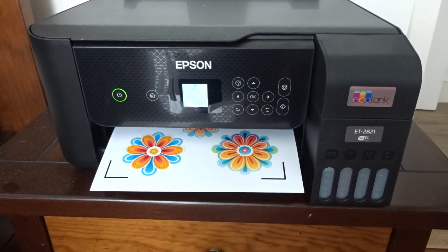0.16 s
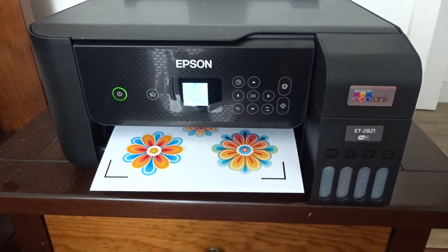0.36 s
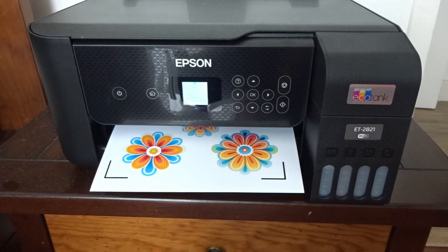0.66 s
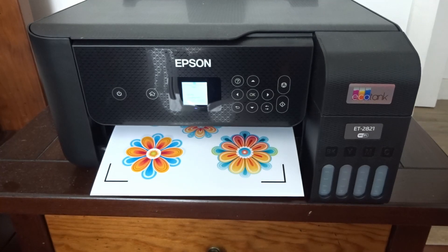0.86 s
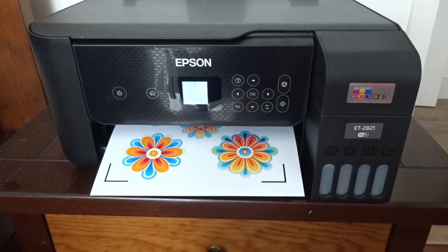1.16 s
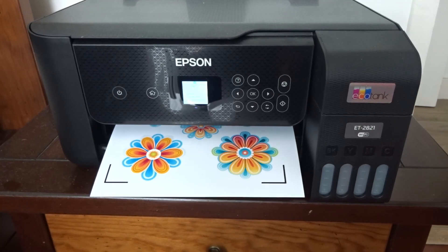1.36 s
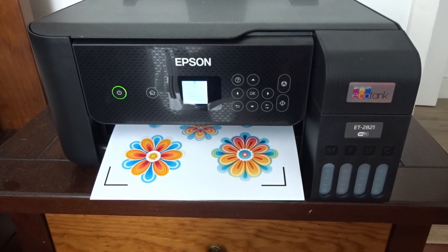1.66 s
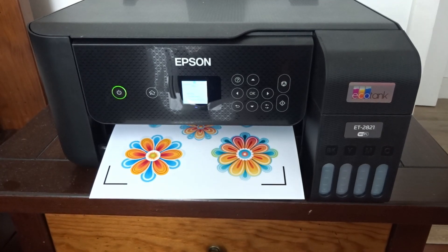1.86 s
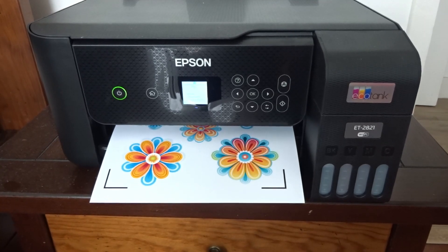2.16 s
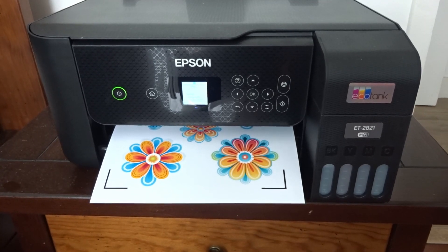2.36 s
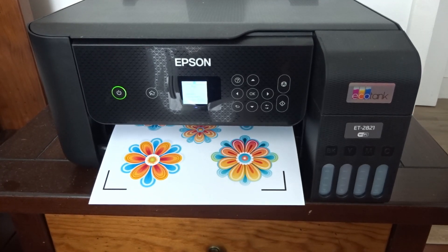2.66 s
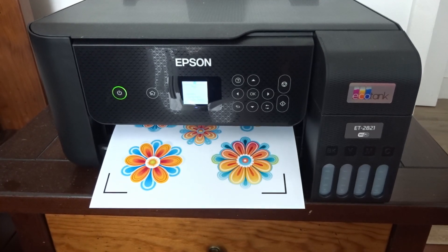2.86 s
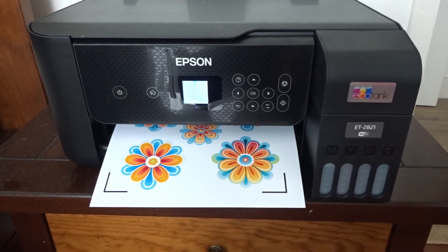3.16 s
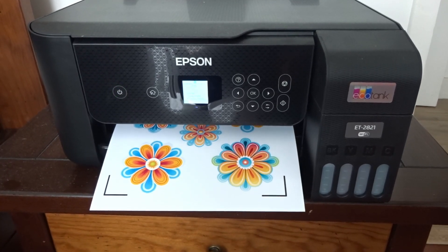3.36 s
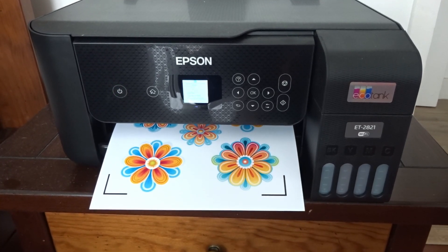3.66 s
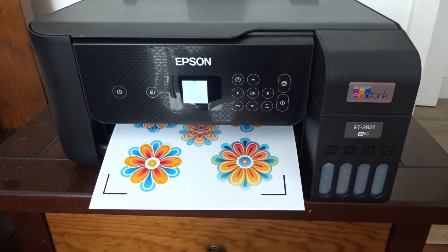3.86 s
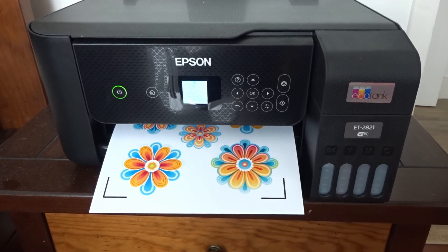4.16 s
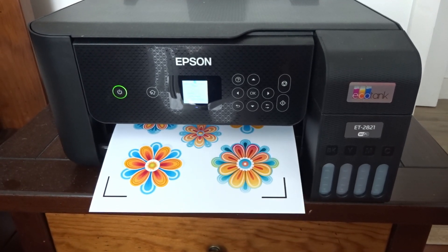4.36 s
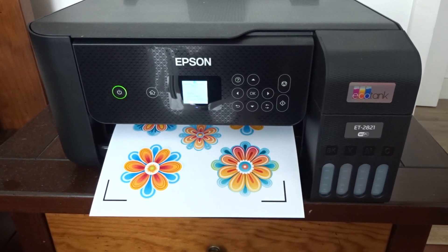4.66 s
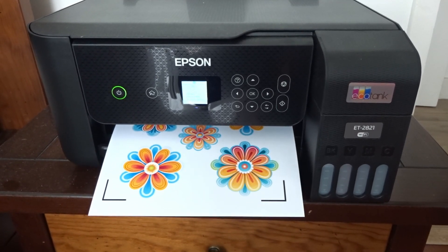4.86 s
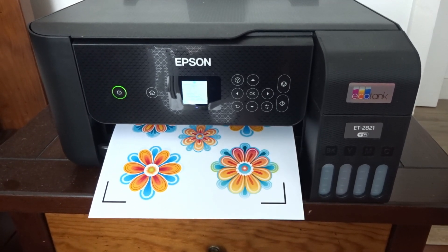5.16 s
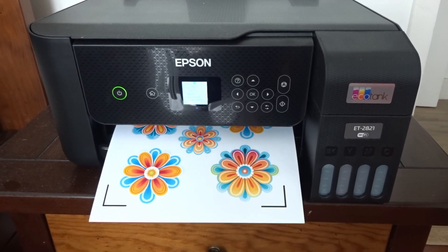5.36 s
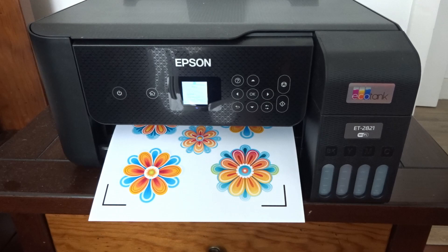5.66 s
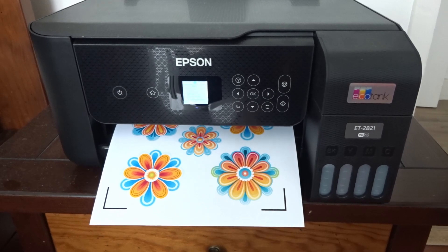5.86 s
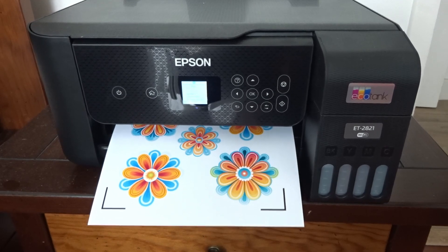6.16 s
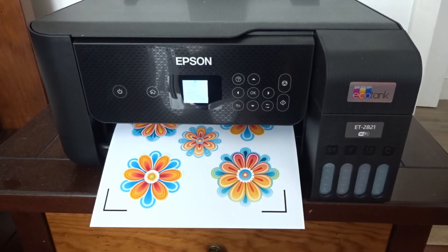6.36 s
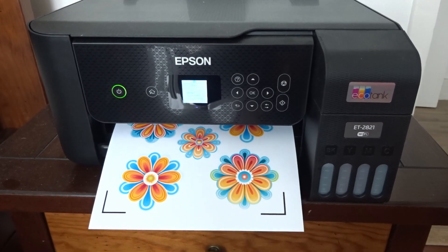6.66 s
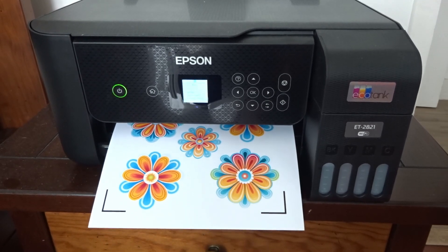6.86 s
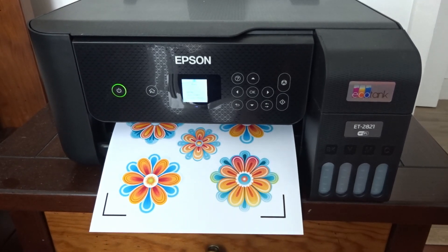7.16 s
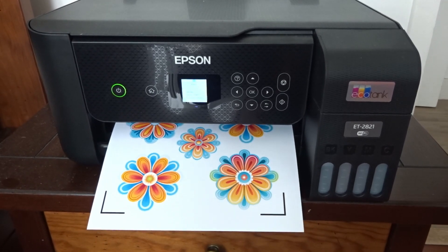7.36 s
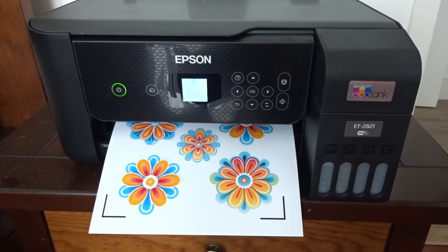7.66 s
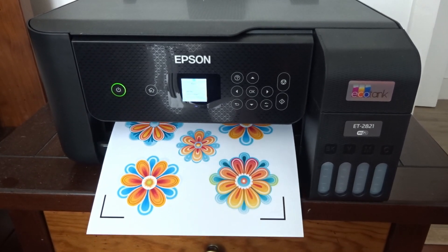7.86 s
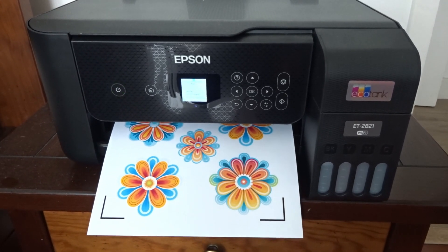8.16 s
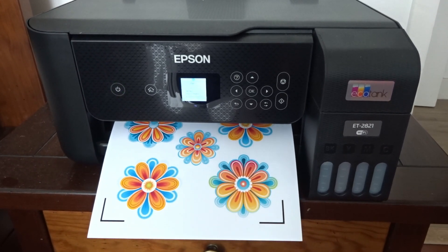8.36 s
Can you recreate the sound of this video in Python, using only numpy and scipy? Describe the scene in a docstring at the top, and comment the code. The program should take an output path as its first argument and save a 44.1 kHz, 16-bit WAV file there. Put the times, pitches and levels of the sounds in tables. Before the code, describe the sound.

A desktop inkjet printer shuttles its carriage back and forth, gears knocking at each turn, pauses briefly, then a plastic lever snaps and printing continues.

```python
"""An inkjet printer prints a page on a wooden cabinet in a quiet room, heard from close in front.
The carriage slides on a resonant rail with a thin motor whine, noise bands that follow its speed, and
scuffs past the same guides on every trip. At each turn the feed gears knock, rattle the case and knock again.
Midway the carriage parks briefly; later a plastic lever snaps over and rattles in filtered bursts of noise.
Diffuse echoes spread the printer to the sides, over a bed of steady coloured room noise."""
import sys
import numpy as np
from scipy import signal
from scipy.fft import rfft, irfft
from scipy.io import wavfile

SR = 44100
rng = np.random.default_rng(int(sys.argv[2]) if len(sys.argv) > 2 else 0)


def pcm_store(signal):
    """Save signal as 16-bit PCM."""
    levels = np.round(np.clip(np.atleast_2d(signal), -1, 1) * 32767)
    wavfile.write(sys.argv[1], SR, levels.astype(np.int16).T)


N = 375291
T = np.arange(N) / SR  # s

# Paper feed steps, one at a turn of the carriage. Each row: start in seconds, then the relative levels
# in dB of the starting knock, its case thud, the braking knock and the gear rattle.
FEEDS = [(0.002, -33, -37.5, -46, -48.5), (0.3995, -31.5, -40, -44, -46), (0.7955, -31, -36.5, -40, -48.5),
         (1.1944, -30, -45, -41, -47), (1.5938, -28.5, -37, -26.5, -45.5), (2.0053, -23.5, -33, -22, -44),
         (2.4171, -21, -28, -31, -47.5), (2.8389, -32, -36, -35, -45.5), (3.253, -26, -33, -35, -45),
         (4.5232, -30, -40, -42, -48), (4.9377, -27.5, -37, -27.5, -47), (5.3552, -29.5, -35.5, -38, -48),
         (5.779, -29.5, -40, -27.5, -46.5), (6.1949, -30, -37.5, -42, -44.5),
         (6.6084, -29, -36, -44, -46.5), (7.0253, -26.5, -32.5, -28, -46), (7.443, -26.5, -35, -40, -46.5),
         (7.8615, -19, -30.5, -34, -45.5), (8.2786, -31, -34, -32.5, -48)]
# The carriage stands still between these two times: stop and restart in seconds.
REST = (3.696, 4.078)
# Spectrum of the meshing gear teeth. Each row: frequency in Hz, relative level in dB.
GEARS = [(70, -33), (120, -28), (145, -12.5), (185, -18.5), (220, 0.5), (350, -2), (550, 2.5), (900, -2.5),
         (1350, -5.5), (1700, -8.5), (2200, -5), (3500, -11.5), (4300, -11.5), (15000, -23)]
# Resonances of the plastic case. Each row: centre in Hz, width in Hz, height in dB.
CASE_MODES = [(226, 14, 2.4), (231.5, 16, 2.4), (284, 12.5, 8.6), (332, 11, 2.4), (409.6, 4.3, 8),
              (497, 63, 7.4), (583, 25, 3.6), (705, 18, 11), (793, 35, 7.8), (1020, 150, 3.8),
              (1310, 68, 1.1), (1504, 76, 3.1), (1930, 390, 6.5), (2320, 310, 1.05), (3370, 210, 4)]
FEED_S = .108  # the carriage waits this long for each feed step
PUSH_S = .034  # a feed step drives this long, then brakes
PARK_RUN_S = .033  # extra travel between the page and the parking place


def undb(db):
    """Convert a level in decibels to an amplitude ratio."""
    return 10 ** (np.asarray(db) / 20)


def unit(x):
    """Normalise the mean power: scale to rms 1."""
    return x / np.sqrt(np.mean(x ** 2))


def add(out, s, x):
    """Superpose x on out from time s on."""
    i = max(int(s * SR), 0)
    out[i:i + len(x)] += x[:max(N - i, 0)]


def walk(rate):
    """Slow random modulation: random knots, rate per second, joined by lines; spread near 1."""
    knots = rng.standard_normal(N // 8)
    return 1.22 * np.interp(T * rate, np.arange(len(knots)), knots)


def swell(centre_s, width_s):
    """Gaussian envelope: a smooth rise and fall around one moment."""
    return np.exp(-((T - centre_s) / width_s) ** 2)


def colour(x, spectrum, modes=(), size=8192, keep_power=True):
    """Minimum-phase filtering: a smooth spectrum with resonances standing on it."""
    f = np.arange(size // 2 + 1) * SR / size + 1e-3  # kept above zero for the logarithm
    hz, db = np.transpose(spectrum)
    curve = np.interp(np.log(f), np.log(hz), db)
    for centre, width, height in modes:
        curve = curve + height / (1 + (2 * (f - centre) / width) ** 2)
    # folding the cepstrum onto positive times makes the response causal
    cepstrum = irfft(np.log(undb(curve)))
    cepstrum[1:size // 2] *= 2
    cepstrum[size // 2 + 1:] = 0
    response = irfft(np.exp(rfft(cepstrum)))
    if keep_power:
        response /= np.linalg.norm(response)
    return signal.oaconvolve(x, response)[:N]


def grit(spread_db):
    """Friction noise: dense tiny contacts of uneven strength."""
    return unit(rng.standard_normal(N) * undb(spread_db * walk(900)))


def tones(lines, waver_hz=14):
    """Frequency and amplitude modulation: slightly wavering sines from rows (Hz, rms dB)."""
    total = 0
    for hz, db in lines:
        level = undb(db + 2 * walk(43))
        phase = 2 * np.pi * np.cumsum(hz + waver_hz * walk(90)) / SR
        total = total + level * np.sqrt(2) * np.sin(phase)
    return total


def blows(times, levels_db, click, rise_s, ring_s, tail_db, tail_s):
    """Impact excitation: a click, a dense ring of the part, and a weaker tail inside the housing."""
    out, t = np.zeros(N), T[:SR // 3]
    decay = np.exp(-t / ring_s) + undb(tail_db) * np.exp(-t / tail_s)
    shape = (1 - np.exp(-t / rise_s)) * decay
    for s, db in zip(times, levels_db):
        blow = shape * rng.standard_normal(len(t))
        blow[0] += click
        add(out, s, undb(db) * blow)
    return out


def reflections(x, t60):
    """Diffuse reverberation: exponentially decaying echoes of unit power."""
    t = T[:SR // 2]
    response = rng.standard_normal(len(t)) * undb(-60 * t / t60) * (t > .002)
    return signal.oaconvolve(x, response / np.linalg.norm(response))[:N]


def passes():
    """Reciprocating motion, back and out by turns: rows (start s, end s, mid-page s, direction 1 out -1 back)."""
    feeds = np.array(FEEDS)[:, 0]
    stop, go = REST
    last_end = feeds[-1] + np.median(np.diff(feeds))
    starts = np.sort(np.append(feeds, go))
    ends = np.sort(np.append(feeds[1:], [stop, last_end]))
    # the parking run lies outside the page
    page_starts = starts + PARK_RUN_S * (starts == go)
    page_ends = ends - PARK_RUN_S * (ends == stop)
    middles = (page_starts + page_ends) / 2
    return list(zip(starts, ends, middles, -(-1) ** np.arange(len(starts))))


def carriage(run_up_s=.07, brake_s=.05, start_speed=.76, sing_db=2, sing_s=.08):
    """Sliding friction excites the rail; the motor whine follows the speed, gliding up and sagging into the turn."""
    # Spectrum of the sliding contact. Each row: frequency in Hz, relative level in dB.
    rail = [(53, -86), (90, -48), (136, -19), (271, -10.5), (296, -5.5), (376, -9.5), (555, -3), (592, -1),
            (893, -4.5), (1110, -2), (2030, -10), (3340, -6), (5380, -14), (5870, -7.5), (15900, -25.5)]
    # Resonances of the rail. Each row: centre in Hz, width in Hz, height in dB.
    rail_modes = [(153.5, 19, 8.4), (323, 90, 2.3), (497, 36, 5.6), (585, 35, 1.7), (738, 43, 6.8),
                  (1010, 35, 1.5), (1270, 24, 2.6), (1364, 47, 5.5), (1960, 230, 7), (2750, 110, 1),
                  (3320, 100, 2.5), (4600, 130, 1.6), (5090, 120, 5.8)]
    # Whine of motor, belt and rail. Each row: frequency at full speed in Hz, width in Hz, relative
    # level in dB, share of the pitch that follows the speed from 0 to 1.
    whine_bands = [(303, 18, -68, 1), (600, 40, -65.5, 1), (1233, 20, -69, 0.2), (5730, 220, -65, .1),
                   (5970, 160, -66, .1), (7530, 700, -66.5, 1), (8020, 380, -65, 0.99),
                   (8780, 80, -66.5, 0.98)]
    motion, breakaway, strain, singing = np.zeros((4, N))
    for turn, end, middle, direction in passes():
        start = turn if turn == REST[1] else turn + FEED_S
        ramp = np.interp(T, [start, start + run_up_s, end - brake_s, end + .02], [0, 1, 1, 0])
        motion += np.sin(np.pi / 2 * ramp)
        # a squeak of uneven strength at each start, except out of the rest
        breakaway += (start != REST[1]) * swell(start + 0.0081, 0.0057) * undb(0.86 * rng.standard_normal())
        strain += belt_strain(start, end, direction)
        singing += swell(middle + .04, sing_s)
    speed = start_speed + (1 - start_speed) * motion  # 1 is full speed
    # at the rest the mechanism runs out and falls quiet
    resting = (T > REST[0]) & (T < REST[1])
    awake = np.where(resting, np.exp(-np.abs(T - REST[0]) / .14), 1)
    contact = grit(spread_db=1.3) * undb(.8 * walk(14) - 2.2 * (1 - motion))
    slide = undb(-52) * colour(contact, rail, rail_modes)
    whine = 0
    for hz, width, db, follow in whine_bands:
        carrier = np.exp(2j * np.pi * hz * np.cumsum(1 + follow * (speed - 1)) / SR)
        band = ((walk(width) + 1j * walk(width)) * carrier).real
        # bands fixed in pitch belong to the rail, which sings most just past mid-page
        whine = whine + undb(db + (1 - follow) * sing_db * (2 * singing - 1)) * band
    belt_phase = 2 * np.pi * np.cumsum(1088 + 20 * walk(60)) / SR
    belt = undb(-53.5 + 2 * walk(25)) * strain * np.sin(belt_phase)
    frame = motion * tones([(146, -75.5)], waver_hz=8.04)
    # the motor squeaks, with its octave, as it breaks away
    phase = 2 * np.pi * np.cumsum(6720 + 450 * motion + 110 * walk(830)) / SR
    squeak = breakaway * (undb(-51) * np.sin(phase) + undb(-55.5) * np.sin(2 * phase))
    return awake * (slide + np.sqrt(motion) * whine + belt + frame) + squeak


def belt_strain(start, end, direction, start_share=.25, drag_share=.35, peak_share=.65, late_share=.55,
                peak_lead_s=.097):
    """Load sets the belt's hum: a little after the start, and on the way out strongest toward the end."""
    drag = np.interp(T, [start, start + .06, end - .01, end + .01], [0, 1, 1, 0])
    peak = peak_share * swell(end - peak_lead_s, .026)
    late = late_share * swell(end - .04, .045)
    outward = drag_share * drag + peak + late
    return start_share * swell(start + .06, .06) + (direction > 0) * outward


def stop_and_go():
    """Inertia: the frame rumbles and rocks at the stop; the motor whistles under load, the case shudders off."""
    rumble_spectrum = [(100, -36), (220, -4), (400, -1), (750, -8), (1500, -18), (6000, -21)]  # (Hz, dB)
    rock_spectrum = [(120, -40), (235, 0), (330, -9), (500, -14), (1200, -40)]
    stop, go = REST
    run_out, settle = swell(stop + .055, .06), swell(stop + .11, .055)
    load = swell(go - .02, .026)
    jolt, sway = (T > go) * swell(go + .027, .028), swell(go + .09, .06)
    rumble = undb(-47.0) * run_out * colour(grit(spread_db=3.5), rumble_spectrum, CASE_MODES)
    rock = undb(-56) * settle * colour(grit(spread_db=2), rock_spectrum)
    whistle = load * tones([(8830, -60)])
    shudder = undb(-45.5) * jolt * colour(grit(spread_db=-0.5), GEARS, CASE_MODES)
    return rumble + rock + whistle + shudder + sway * tones([(216, -57.5)], waver_hz=9.4)


def paper_feed(coast_s=0.048, rock_db=-53):
    """Gear meshing excites case resonances in a short push, then decays as the roller coasts out."""
    # Spectrum of the frame rocking on the cabinet. Each row: frequency in Hz, relative level in dB.
    rock_spectrum = [(70, -38), (115, -16.5), (145, 0.5), (180, 0), (220, -3), (300, 0), (520, 0),
                     (900, -15.5), (3000, -49)]
    push, settle = np.zeros(N), np.zeros(N)
    t = T[:SR // 2]
    for s, *_, db in FEEDS:
        coast = np.exp(-np.maximum(t - PUSH_S, 0) / coast_s)
        add(push, s, undb(db) * np.minimum(t / 0.0049, 1) * coast)
        settle += undb(rock_db) * swell(s + 0.09, 0.04)
    # single teeth click dully through the rattle, about 110 a second
    clicks = unit((rng.random(N) < 110 / SR) * rng.standard_normal(N))
    chatter = signal.sosfilt(signal.butter(4, 4000, fs=SR, output="sos"), clicks)
    teeth = grit(spread_db=3) + .6 * chatter
    rattle = undb(1.2) * push * colour(teeth, GEARS, CASE_MODES)
    # the reversing carriage rocks the frame, and the cabinet booms
    rock = settle * colour(grit(spread_db=2.5), rock_spectrum, CASE_MODES + [(213, 20, 5)])
    return rattle + rock


def knocks(hard_db=-18, brake_thud_db=-13.5, take_up_s=.078):
    """Impact across backlash: a click, sharper the harder the parts meet, then the duller answer of the case."""
    # Spectrum of the meeting teeth. Each row: frequency in Hz, relative level in dB.
    knock_spectrum = [(60, -61), (300, -20), (1000, -6), (1800, 2), (2600, 6), (3750, 0), (4250, -10),
                      (8000, -18.5), (15000, -44)]
    # Spectrum of the case's answer. Each row: frequency in Hz, relative level in dB.
    thud_spectrum = [(50, -60), (100, -33), (250, -41.5), (470, 1.5), (900, 1), (1400, 6), (1800, -36),
                     (4000, -25)]
    # rows (s, knock dB, thud dB); the carriage also knocks as it leaves the parking place
    starting = [(s, db, thud_db) for s, db, thud_db, _, _ in FEEDS] + [(REST[1], -31, -43)]
    braking = [(s + PUSH_S, db, db + brake_thud_db) for s, _, _, db, _ in FEEDS]
    # the belt jerks taut for the way back
    take_up = [(turn + take_up_s, -37, -42) for turn, _, _, direction in passes() if direction < 0]
    s, db, thud_db = np.transpose(starting + braking + take_up)
    teeth = blows(s, db, click=7, rise_s=.0006, ring_s=.003, tail_db=-10, tail_s=.022)
    # this extra click grows twice as fast in dB as the knock
    teeth[(s * SR).astype(int)] += 10 * undb(2 * db - hard_db)
    case = blows(s, thud_db, click=4, rise_s=.0012, ring_s=.007, tail_db=-13, tail_s=.038)
    knock = undb(-11.0) * colour(teeth, knock_spectrum, CASE_MODES)
    return knock + undb(-2.0) * colour(case, thud_spectrum, CASE_MODES)


def ticks(park_db=-30, park_body_db=-24, mid_click_db=-51, rise_s=0.0014, ring_s=.0026):
    """Brief contact: a rub, a bright scuff and a little body at each guide and at the parking place."""
    # Guides brushed on every trip. Each row: direction 1 out or -1 back, seconds after mid-page,
    # relative level in dB, level of the body relative to it in dB.
    guides = [(1, .1435, -35, -1.5), (-1, .042, -40.5, -20), (-1, .184, -51.5, 7)]
    # Spectrum of the scuff. Each row: frequency in Hz, relative level in dB.
    scuff_spectrum = [(80, -50), (500, -30), (1500, -9.5), (3000, 2), (4600, 0), (8000, 0), (10000, -7),
                      (13000, -5), (16000, -24)]
    scuff_modes = [(3160, 360, 2.1), (5950, 500, 1.6)]  # (Hz, width Hz, dB)
    body_spectrum = [(60, -50), (250, -20), (700, -4.0), (1000, 6.5), (1400, -1.0), (2500, -17), (5000, -25)]
    tiny_spectrum = [(4000, -19), (9000, -17), (12000, -2), (15500, -9)]
    brushes = [(middle + after_s, db, body_db) for _, _, middle, direction in passes()
               for way, after_s, db, body_db in guides if way * direction > 0]
    s, db, body_db = np.transpose(brushes + [(REST[0], park_db, park_body_db)])
    scuff = blows(s + .001, db, click=1.2, rise_s=rise_s, ring_s=ring_s, tail_db=-26, tail_s=.02)
    rubbing = sum(undb(level - 19) * swell(time, .005) for time, level in zip(s, db))
    rub = rubbing * grit(spread_db=3)
    body = blows(s, db + body_db, click=1, rise_s=.002, ring_s=.007, tail_db=-19, tail_s=.035)
    # a tiny high click at mid-page on the way back
    clicks = [(middle, mid_click_db) for _, _, middle, direction in passes() if direction < 0]
    tiny = blows(*np.transpose(clicks), click=1, rise_s=.001, ring_s=.002, tail_db=-24, tail_s=.01)
    return (undb(4.0) * colour(scuff + rub, scuff_spectrum, scuff_modes)
            + undb(-1.5) * colour(body, body_spectrum)
            + undb(1.5) * colour(tiny, tiny_spectrum))


def motor_drive(drive_db=-1, far_end_db=2.0, hold_db=0, lead_s=.008, on_s=0.13):
    """Drive current sings as steady tones in each feed step, louder at the far end, and faintly in the rest."""
    # Tones of the powered feed motor. Each row: frequency in Hz, relative level in dB.
    drive_lines = [(4990, -75), (10810, -77), (11240, -74), (12970, -80), (14270, -77), (14700, -73),
                   (15135, -72)]
    # Tones while the carriage is held at rest. Each row: frequency in Hz, relative level in dB.
    hold_lines = [(2000, -69.5), (4990, -72), (5615, -82), (9980, -81), (11240, -74), (13404, -84)]
    powered = np.zeros(N)
    for turn, _, _, direction in passes():
        if turn != REST[1]:
            gate = np.interp(T - turn + lead_s, [0, .005, on_s, on_s + .01], [0, 1, 1, 0])
            powered += undb(far_end_db * (direction < 0)) * gate
    held = np.interp(T, [REST[0], 3.88, 3.96, 4.01], [0, 1, 1, 0])
    return undb(drive_db) * powered * tones(drive_lines) + undb(hold_db) * held * tones(hold_lines)


def lever(slide_db=-57, slide_s=.1):
    """Stored spring energy is released: the lever slides on its catch, scrapes off, lands twice and chatters."""
    # Hits of the lever. Each row: start in seconds, relative level in dB.
    snaps = [(4.5697, -20), (4.5776, -19.5), (4.586, -27), (4.598, -34), (4.617, -27), (4.6238, -31),
             (4.651, -30.5), (4.668, -51)]
    # Spectrum of the plastic. Each row: frequency in Hz, relative level in dB.
    snap_spectrum = [(50, -50), (110, -22), (200, -8.5), (273, -30), (394, -8), (547, -11), (669, -0.5),
                     (1020, -1.5), (1550, -5.5), (2010, -1.5), (3540, -6), (3880, -6.5), (6020, 0),
                     (15900, -8)]
    # Resonances of lever and housing. Each row: centre in Hz, width in Hz, height in dB.
    snap_modes = [(770, 160, 3), (1010, 40, 4), (1980, 200, 5), (2710, 40, 4), (4600, 260, 5),
                  (5140, 120, 5), (5540, 40, 4), (5950, 350, 5), (7240, 50, 5), (8280, 80, 3),
                  (10230, 300, 4), (10900, 400, 3), (11700, 40, 4)]
    s, db = np.transpose(snaps)
    hits = blows(s, db, click=2.5, rise_s=.001, ring_s=.0026, tail_db=-14, tail_s=.035)
    slide = undb(slide_db) * (T > s[0] - slide_s) * (T < s[0])
    release = undb(-54) * swell(s[0] - .012, 0.031) + undb(-31) * swell(s[0], 0.0021)
    scrape = (slide + release) * grit(spread_db=3.5)
    return undb(3) * colour(hits + scrape, snap_spectrum, snap_modes)


def room_noise():
    """Stationary random noise: the quiet room as one steady coloured bed."""
    # Spectrum of the room. Each row: frequency in Hz, relative level in dB.
    room_spectrum = [(25, -16), (50, -4), (90, 3.5), (150, 12), (300, 28.5), (600, 24.5), (1500, 22),
                     (3000, 18), (6000, 10.5), (10000, 8.5), (16000, 10)]
    return undb(-57.5) * colour(rng.standard_normal(N), room_spectrum)


def brighten(x, treble_db=0.7, dull_start_db=-3.5, brighten_s=1.3, above_hz=9000):
    """Time-varying shelf: the top of the treble starts dull and opens up over the first seconds."""
    treble = signal.sosfiltfilt(signal.butter(4, above_hz, "high", fs=SR, output="sos"), x)
    gain = undb(treble_db + dull_start_db * np.exp(-T / brighten_s))
    return x + (gain - 1) * treble


def spread(x, side_spectrum):
    """Decorrelation: close echoes off the cabinet enter left and right with opposite sign."""
    side = colour(reflections(x, t60=0.088), side_spectrum, keep_power=False)
    return np.array([x + side, x - side])


def scene():
    """Superposition: the printer stands straight ahead; cabinet and walls spread it to the sides."""
    # Width of printer and room. Each row: frequency in Hz, side level minus mid level in dB.
    printer_width = [(30, 3), (80, 0), (160, -21.5), (350, -9.5), (520, -11.5), (740, 1.5), (1000, -8.5),
                     (1800, -8), (3000, -9.5), (8000, -14), (15000, -28)]
    # Width of the lever. Each row: frequency in Hz, side level minus mid level in dB.
    lever_width = [(200, -17), (700, -10), (2400, -15), (4400, -12), (8100, -9), (15000, -7)]
    running = carriage() + stop_and_go() + paper_feed() + knocks() + ticks()
    running = running + undb(-10) * reflections(running, t60=.33)
    snap = lever()
    snap = snap + undb(-6.0) * reflections(snap, t60=0.29)
    printer = brighten(running + room_noise()) + motor_drive()
    return spread(printer, printer_width) + spread(snap, lever_width)


def record(dry, top_hz=15650):
    """Band limitation: a steep elliptic low-pass cuts the top of the treble."""
    return signal.sosfilt(signal.ellip(10, .1, 80, top_hz, fs=SR, output="sos"), dry)


dry = scene()
out = record(dry)
pcm_store(out)
```